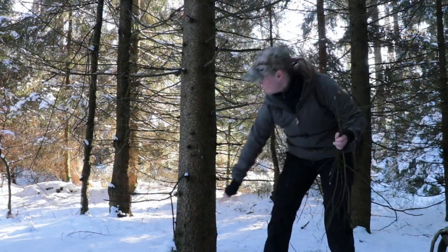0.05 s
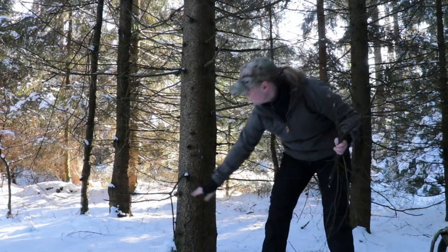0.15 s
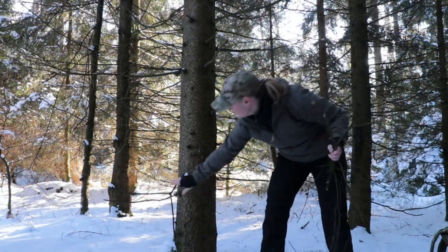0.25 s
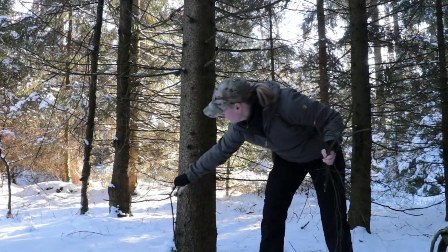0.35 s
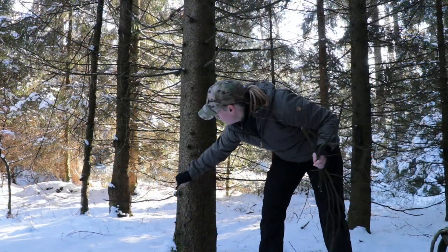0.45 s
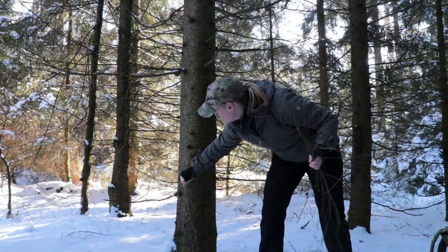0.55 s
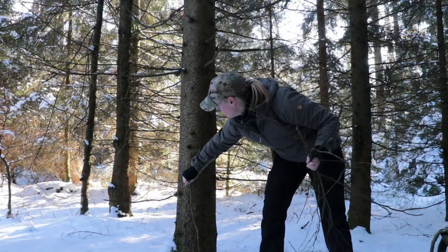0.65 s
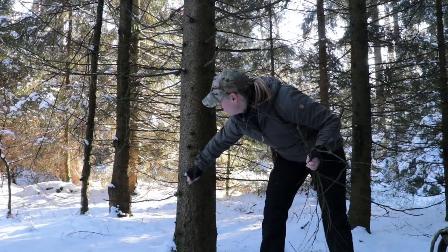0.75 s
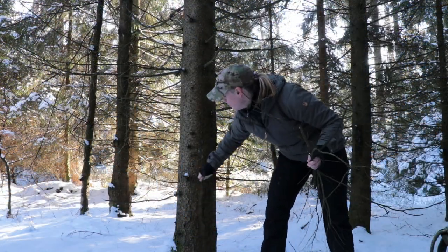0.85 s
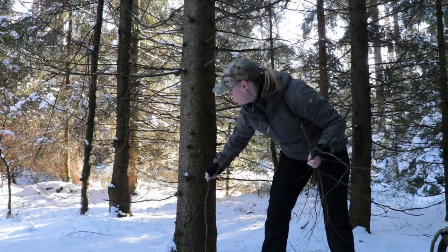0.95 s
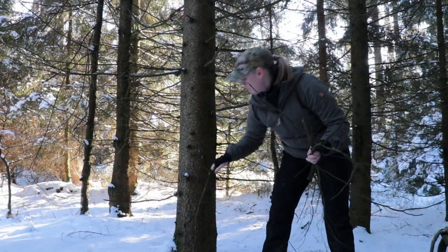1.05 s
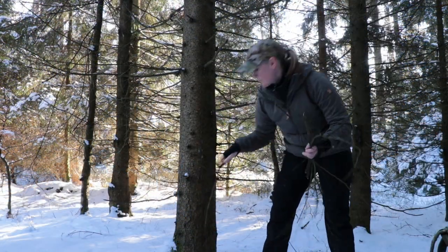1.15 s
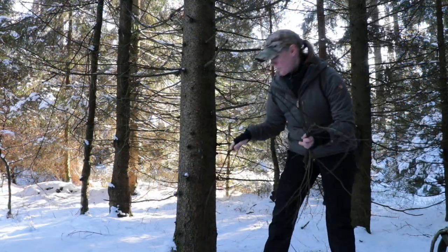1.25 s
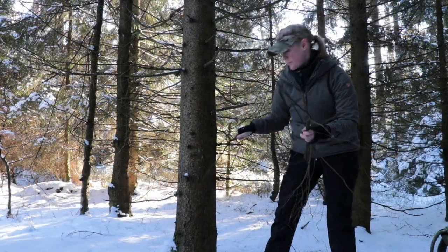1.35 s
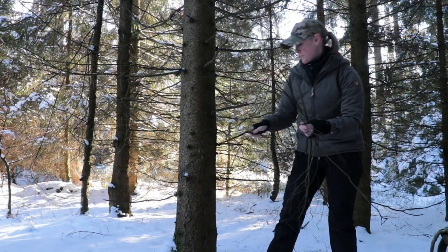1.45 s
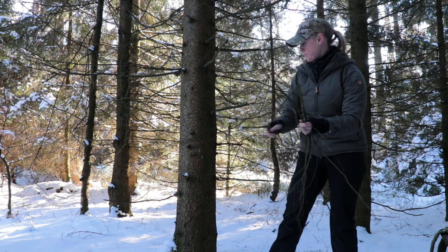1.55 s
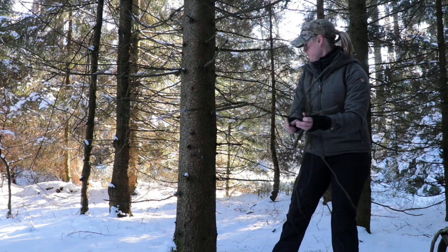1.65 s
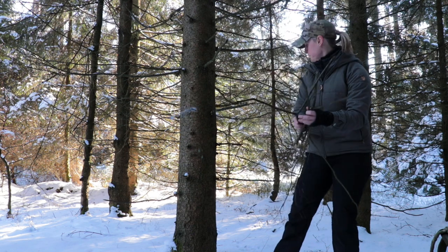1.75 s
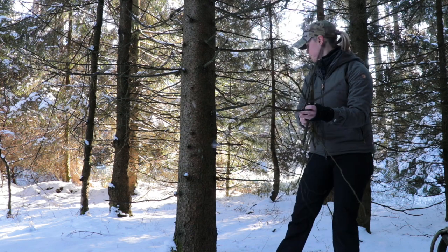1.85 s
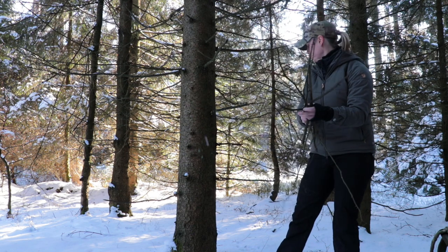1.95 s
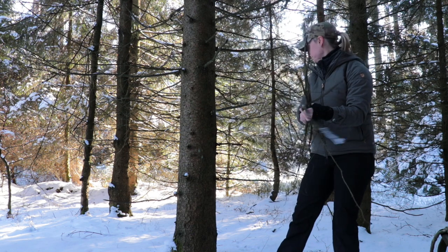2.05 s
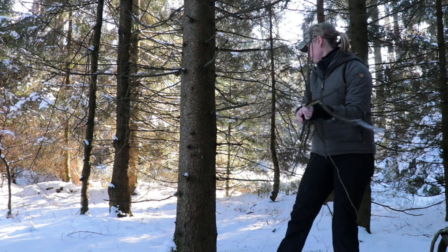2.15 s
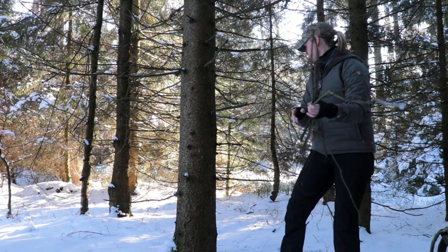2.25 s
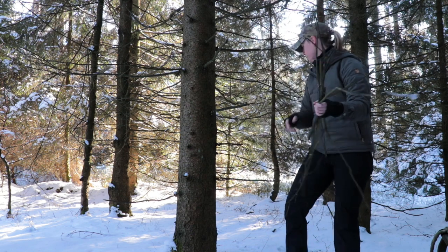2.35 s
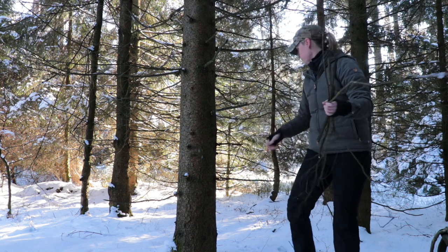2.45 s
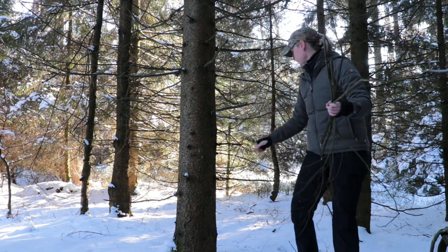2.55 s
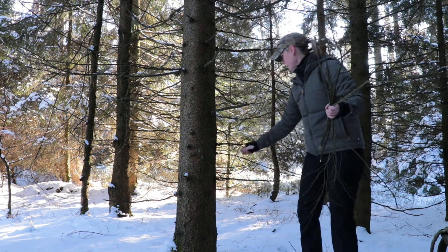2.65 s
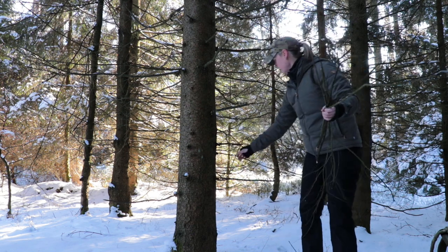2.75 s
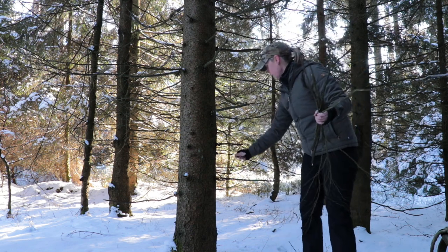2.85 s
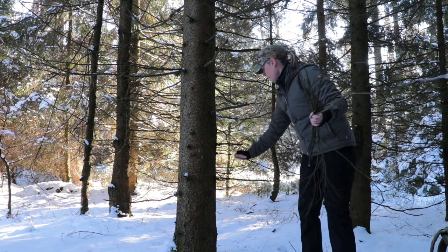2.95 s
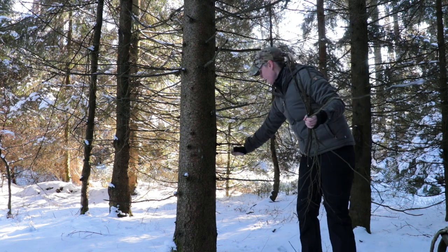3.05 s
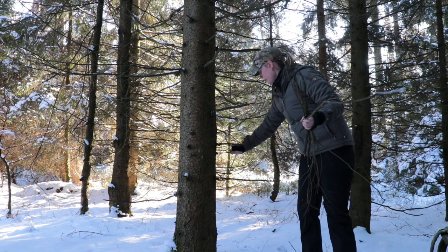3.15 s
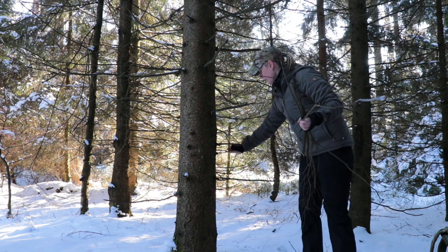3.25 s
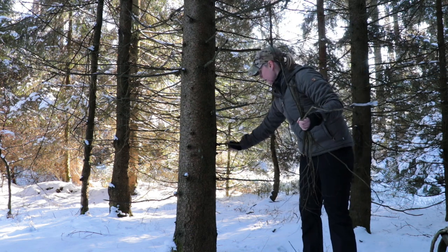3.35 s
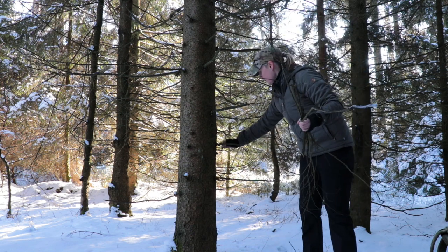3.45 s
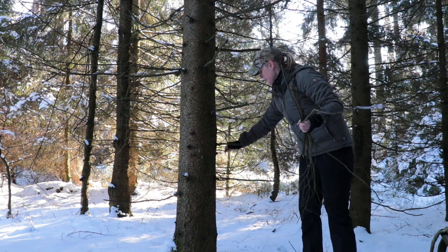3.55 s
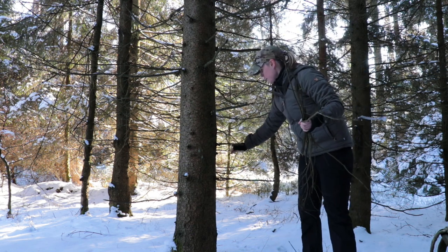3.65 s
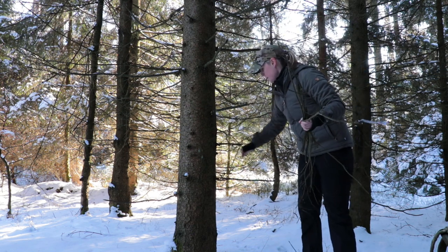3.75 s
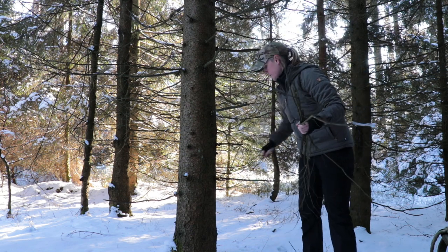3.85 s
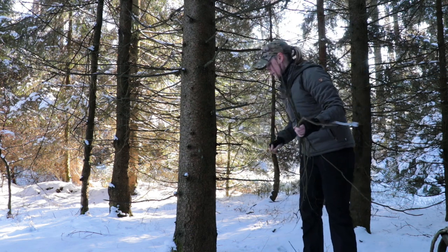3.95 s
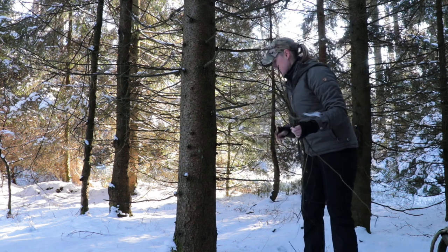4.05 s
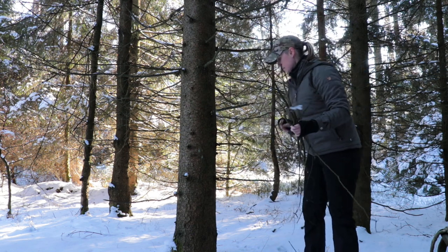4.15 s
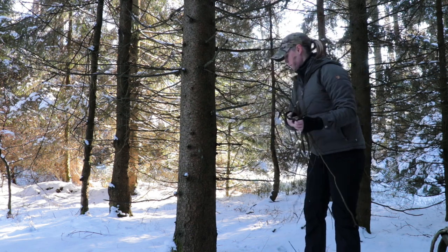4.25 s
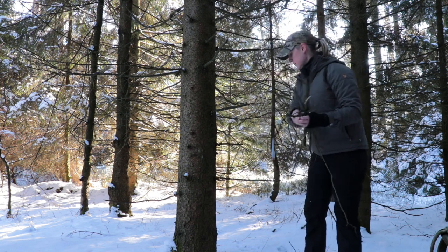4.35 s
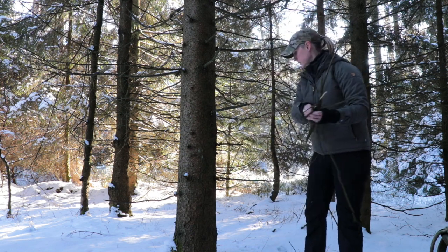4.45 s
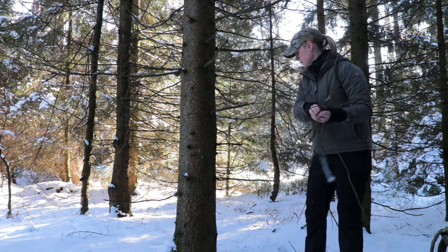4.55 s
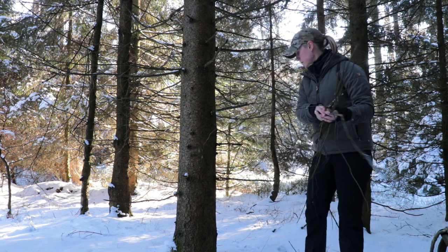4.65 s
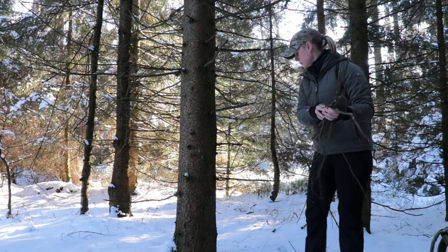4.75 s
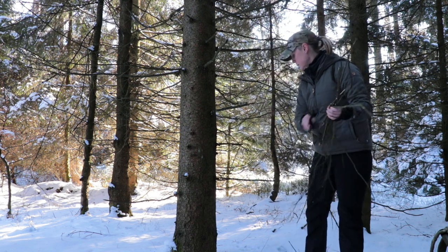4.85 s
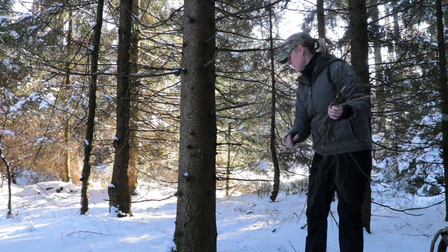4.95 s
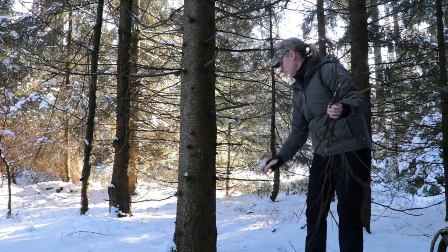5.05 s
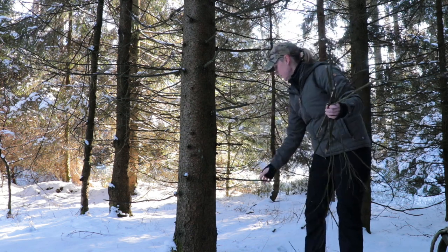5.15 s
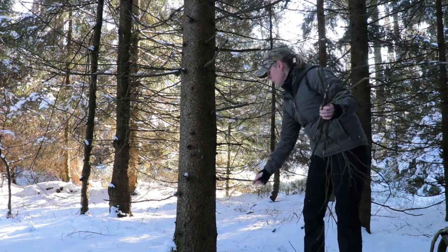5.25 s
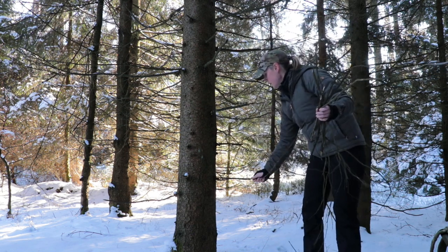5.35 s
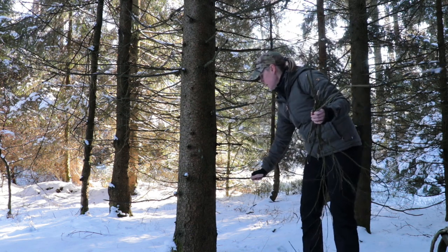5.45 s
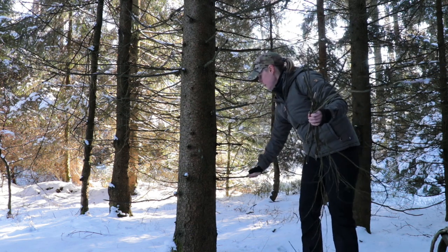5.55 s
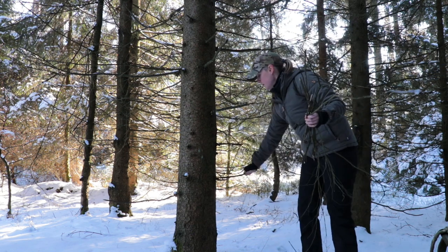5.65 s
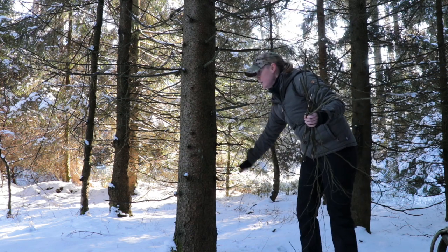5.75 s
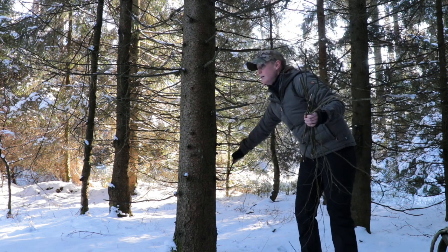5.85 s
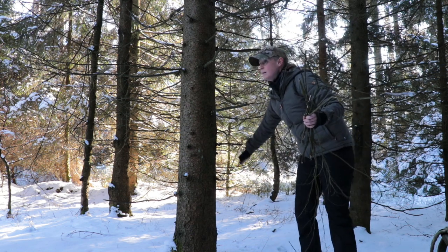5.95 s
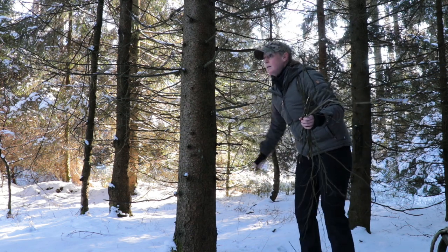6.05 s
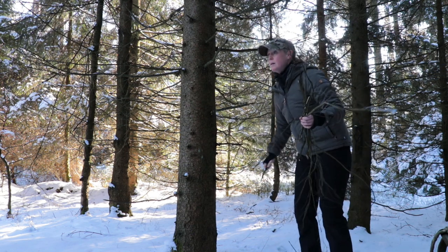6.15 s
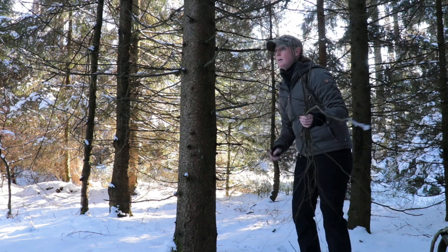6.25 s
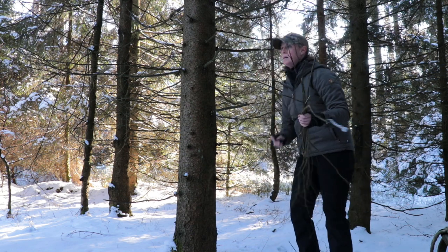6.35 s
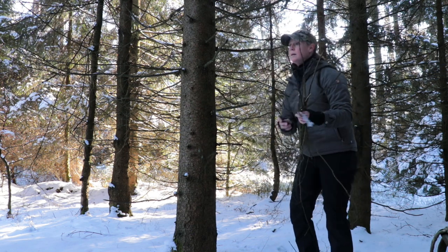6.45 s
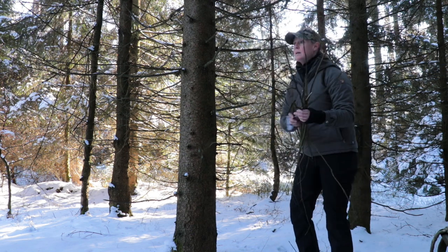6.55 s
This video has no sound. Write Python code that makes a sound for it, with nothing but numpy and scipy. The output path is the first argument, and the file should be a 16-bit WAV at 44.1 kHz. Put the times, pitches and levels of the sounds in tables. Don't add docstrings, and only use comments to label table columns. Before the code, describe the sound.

A quiet snowy forest, heard in stereo from a few metres, with a faint steady hiss. Soft snow crunches and low boot thuds open it. At 0.54 s a tough twig tears with a sharp crack and crackling fibres, again at 0.71-0.76 and, weaker, at 0.83. From 1.5 to 1.9 s small dry ticks and sleeve rustle; a firmer boot knock at 2.13, then gentle shuffling, brushing and weight shifts to 3.2. At 3.33 s a thick branch snaps, very loud, bright and abrupt, with a short diffuse echo off trunks; a thinner twig cracks at 3.55. Light ticks, one clearer at 4.06, cloth scrapes and dull snow thuds continue to about 4.9, then it nearly quiets. At 5.72 s the second branch breaks, the loudest crack, hard-edged and slightly clipped, with a quick forest tail. Faint ticks follow, and a distinct boot thump with rustle at 6.46-6.6.

```python
import sys
import numpy as np
from scipy import signal
from scipy.fft import rfft, irfft
from scipy.io import wavfile
from scipy.ndimage import uniform_filter1d

SR = 44100
rng = np.random.default_rng(int(sys.argv[2]) if len(sys.argv) > 2 else 0)


def output_pcm(signal):
    pcm = np.clip(np.atleast_2d(signal).T, -1, 1) * 32767
    wavfile.write(sys.argv[1], SR, np.round(pcm).astype(np.int16))


def natural_amplitude(level_db):
    exponent = np.asarray(level_db, float) / 20
    return 10 ** exponent


N = 291501

# freq_hz, level_db
HISS = [(41, -29.5), (70, -2), (103, -2.5), (348, -5), (962, -8), (1180, -5.5), (1850, -11), (2780, -11.5),
        (4370, -17.5), (8810, -14), (11800, -17), (15500, -25)]
HISS_DB = -60.5
# freq_hz, likeness
HISS_LIKENESS = [(60, 0.9), (240, 0.35), (950, -0.39), (3770, -0.21), (15000, -0.22)]
# freq_hz, likeness
MOVEMENT_LIKENESS = [(60, 0.95), (240, 0.81), (950, 0.97), (3770, 0.23), (15000, -0.14)]

# freq_hz, level_db
BRUSH_COLOUR = [(3000, -24), (5000, -8), (6500, 4), (10000, 4), (13500, -2), (15500, -9)]
# freq_hz, level_db
CLOTH_COLOUR = [(500, -22.5), (1000, -2), (1400, -0.5), (2000, -7), (3300, -2.5), (4500, -10), (6500, -25)]
# freq_hz, level_db
CRUNCH_COLOUR = [(120, -22.5), (250, -8), (380, 1), (550, -7), (900, -9), (1600, -25.5)]
# freq_hz, level_db
WEIGHT_COLOUR = [(20, -25), (40, 2), (58, 3), (90, -5.5), (160, -10), (300, -32.5)]
# time_s, effort_db
ARMS = [(0, -60.5), (.72, -66), (.86, -62.5), (1.23, -67), (1.56, -63), (1.69, -57), (1.91, -62),
        (2.36, -74), (2.72, -70), (2.91, -62), (3.22, -65), (3.81, -76), (4.07, -63), (4.2, -61.5),
        (4.84, -70), (5.58, -74.5), (6.45, -74), (6.61, -61)]
# time_s, effort_db
LEGS = [(0, -64), (.15, -63), (.33, -69), (.55, -64), (.72, -67), (.86, -60.5), (1.23, -71), (1.56, -65),
        (2.36, -70), (2.91, -63), (3.22, -66), (3.81, -68.5), (4.25, -64), (4.84, -69), (4.95, -67),
        (5.58, -72.5), (6.41, -67.5), (6.61, -70.5)]
SLEEVE_DB, SLEEVE_SLOPE, USUAL_DB = -1.5, 1.1, -65
# middle_s, peak_db, length_s, centre_hz
SCUFFS = [(.01, -55.5, 0.026, 1520), (0.438, -56, 0.036, 3500), (.555, -47, .04, 9000),
          (.565, -52, .06, 3000), (.6, -55, .09, 4500), (.74, -52, .07, 3000), (.765, -50, .06, 9500),
          (.845, -52, .07, 4500), (1.27, -65, .3, 1200), (1.555, -53, 0.082, 1380), (1.56, -57, .06, 8000),
          (1.6, -59, .06, 3000), (1.661, -55, 0.08, 2490), (1.735, -57, .06, 9000), (1.816, -54, .03, 9500),
          (1.809, -53, 0.06, 1400), (2.275, -55.5, 0.1, 1770), (2.69, -62.5, 0.11, 1500),
          (2.85, -58.5, 0.035, 2500), (2.971, -59, 0.054, 3180), (3.032, -59.5, 0.044, 2980),
          (2.97, -58, .05, 8000), (3.03, -59, .05, 9000), (3.09, -58, .07, 8500), (3.81, -58, .025, 5000),
          (4.39, -58, .02, 9500), (3.105, -59, 0.072, 2500), (3.125, -56, 0.082, 1090),
          (3.238, -63, .05, 3000), (4.17, -57.5, 0.16, 2600), (4.3, -57, 0.061, 2000),
          (4.343, -57, 0.019, 1500), (4.411, -59, .03, 3500), (4.496, -60, .04, 1520),
          (4.5, -60, .04, 8500), (4.589, -60, .04, 8500), (4.589, -58, .05, 2800), (4.59, -58, .06, 200),
          (4.643, -57, 0.027, 1450), (4.94, -62.5, 0.12, 1500), (5.299, -63, 0.053, 3000),
          (5.522, -58.5, 0.014, 990)]
# start_s, length_s, level_db
ROLLS = [(0.007, 0.053, -61), (0.176, 0.173, -59), (0.924, 0.029, -62), (1.757, 0.035, -62),
         (2.13, 0.043, -63), (2.271, 0.059, -54), (2.501, 0.029, -64), (2.656, 0.043, -61),
         (2.748, 0.045, -60), (2.82, 0.059, -58), (2.9, 0.105, -57), (3.439, 0.055, -61),
         (3.804, 0.085, -56), (4.117, 0.101, -62), (4.233, 0.167, -53), (4.492, 0.073, -61),
         (4.935, 0.063, -59), (5.939, 0.033, -61), (6.284, 0.123, -59), (6.452, 0.087, -54)]
ROLL_EDGE_S, ROLL_DB, STANDING_DB = .02, -2.5, -2.5
# start_s, peak_db, knock_hz, boom_db (re peak)
THUDS = [(.1, -47, 420, -14), (.12, -50, 400, -14), (.181, -48, 400, -8), (.205, -56, 200, 0),
         (.269, -52, 191, -1), (.295, -46, 446, -10), (.315, -55, 200, 0), (.441, -47, 364, -10),
         (.714, -44, 196, -26), (.804, -45, 196, -25), (.929, -43, 188, -26), (2.132, -38, 200, -20),
         (2.1605, -48, 375, -16), (2.271, -45, 226, -10), (2.283, -48, 336, -8), (2.494, -53, 202, -10),
         (2.689, -47, 300, -17.5), (2.752, -44, 191, -14), (2.77, -50, 191, -7), (2.858, -46, 223, -8),
         (2.905, -43, 252, -8), (2.95, -50, 237, -8), (2.974, -48, 300, -16), (3.014, -43.5, 322, -24),
         (3.077, -42, 340, -30), (3.11, -44.5, 300, -22), (3.402, -44.5, 390, -14), (3.434, -46, 417, -12),
         (3.703, -48, 300, -9), (3.808, -51, 250, 0), (4.023, -45, 315, -22), (4.128, -44.5, 320, -9),
         (4.302, -47, 193, 0), (4.342, -50, 350, -8), (4.423, -42, 380, -21), (4.49, -43, 322, -15),
         (4.503, -41.5, 417, -9), (4.93, -48, 193, -4), (5.385, -57, 250, -5), (5.736, -44, 400, -20),
         (5.94, -47, 250, -6), (6.4612, -39, 330, -8), (6.4645, -39, 220, -12)]
BOOT_LAG = 5

# freq_hz, t60_s
FOREST_T60 = [(500, 0.21), (1500, 0.23), (3000, 0.19), (5000, 0.21), (8000, 0.2), (12000, 0.2),
              (16000, 0.24)]
# freq_hz, level_db
FAR_TRUNKS = [(2000, -22), (8000, -23), (12000, -26), (16000, -31)]
# delay_s, left_db, right_db
NEAR_TRUNKS = [(.0055, -29, -26), (0.0105, -27, -24), (0.017, -19.5, -18), (.0225, -24, -22.5)]

# freq_hz, level_db
CRACK_COLOUR = [(300, -25.5), (900, -13.5), (1600, -5), (3000, -5.5), (3900, -4.5), (5000, -14), (6300, -5),
                (9000, -1.5), (12000, -5.5), (14000, -7.5), (15600, -12), (16500, -30)]
# start_s, peak_db, woody_db (re bright band), ring_hz
BREAKS = [(.5399, -16, -10, 2100), (.5431, -29, -7, 8000), (.5462, -31, -10, 9000), (.549, -35, -14, 2990),
          (.5514, -34, -12, 3120), (.5568, -33, -7, 10000), (.563, -35, -10, 3360), (.5706, -33, -8, 5600),
          (.586, -32, -2.5, 3660), (.5932, -23, -5.5, 2150), (.6108, -39.5, -6, 3140),
          (.618, -42, -10, 7600), (.7147, -19, -5, 4220), (.7202, -25, -6, 4290), (.7308, -23, -17, 11000),
          (.7418, -20, -13, 10500), (.7446, -21, -11, 7200), (.747, -27.5, -9, 1570),
          (.7612, -35, -14, 9000), (.7842, -41, -8, 7000), (.8117, -43, -4, 13000), (.8212, -35, 0, 3790),
          (.8254, -22.5, -4, 2390), (.8291, -27, -8, 2330), (.847, -46, -8, 8500), (.9276, -45, -3, 3290),
          (3.3155, -49, -7, 2430)]
# start_s, peak_db, woody_db (re bright band), ring_hz
TICKS = [(1.525, -40, 5, 1360), (1.5415, -37, -.5, 1290), (1.5541, -46, -2, 1310),
         (1.7705, -35.5, -4, 6500), (1.8064, -44, 5, 1080), (1.82, -44.5, -16, 4290),
         (1.9047, -45.5, -12, 1360), (2.1598, -36.5, -6, 13500), (2.8828, -47.5, -4, 3360),
         (2.9803, -46, 1, 3210), (3.014, -47, -1, 3120), (3.0976, -44, -3, 8000), (3.1054, -41.5, 1, 3680),
         (3.1215, -50, 2.5, 1460), (3.5463, -29, -7, 1920), (3.5527, -42, -7, 2780),
         (3.5934, -48.5, 1, 1590), (3.6893, -43, 8, 3170), (3.764, -39.5, -.5, 2840),
         (3.8057, -48, 3, 1010), (3.977, -41.5, -12, 1310), (4.0578, -31, -2, 6500),
         (4.4061, -45, -10, 2300), (4.6374, -40, 9, 1360), (4.716, -41.5, -7, 3530),
         (4.3835, -47, -11, 8000), (5.3845, -39, -1, 2910), (5.5768, -42.5, -11.5, 2800),
         (6.266, -41, -3, 3230), (6.3279, -46, -8, 1440)]
# start_s, peak_db, woody_db (re bright band), ring_hz
SPLINTERS = [(.412, -50, 0, 2900), (.4294, -47, 0, 3400), (.6537, -45, 2, 3600), (.6925, -45, -14, 8500),
             (1.615, -47, 0, 3000), (1.6459, -46, 4, 3500), (1.7875, -47, -14, 12500),
             (1.8265, -44, -12, 9500), (1.8868, -46, -14, 12000), (2.278, -53, 4, 1400),
             (2.7364, -44, -10, 8500), (2.752, -48, -4, 5500), (2.8396, -48, 2, 3440),
             (2.859, -47, 8, 1500), (2.9499, -47, -3, 8800), (3.004, -48, 6, 1800), (3.0661, -48, 3, 8500),
             (3.077, -45, 6, 1500), (3.135, -47, 2, 2500), (3.6597, -48, -8, 9500), (4.188, -47, 6, 1600),
             (4.213, -48, 2, 2600), (4.313, -48, -12, 12500), (4.45, -50, -8, 11000),
             (4.517, -49, -10, 11000), (4.7225, -47, -10, 9000), (4.7325, -45, -6, 8000),
             (5.2042, -49, 2, 2660), (5.396, -48, -10, 9500), (5.478, -51, 3, 3500),
             (5.512, -49, -12, 8500), (5.546, -51, -12, 8000), (5.631, -51, -3, 5500),
             (6.078, -50, -14, 12000), (6.4614, -50, 3, 1400), (6.605, -47, -8, 10000)]
# start_s, peak_db, t60_s
THICK = [
    (3.3269, -2, .006),
    (5.7193, 4.6, .012),
]
# start_s, then a list of freq_hz, level_db
BRANCHES = [
    (3.327, [(150, -44), (450, -29), (780, -14), (1150, -16), (1600, -1), (1900, -10), (2300, -2), (2650, -11), (3000, -3), (3600, -8), (4350, -22), (5200, -5), (6570, -3.5), (9160, 0), (12800, 0), (14900, -6), (16300, -13.5)]),
    (5.721, [(150, -50), (460, -14), (900, -30), (1250, -17), (1950, -4.5), (2450, -13), (2990, 2), (3280, -9), (3750, -.5), (4800, -12), (5910, -2), (7200, 1.5), (8800, 0), (12300, 1.5), (13000, -11), (15000, -6), (16500, -30)]),
]
# freq_hz, level_db
FIRST_TEAR = [(250, -20), (1160, -13), (1700, -6), (2820, -5), (3600, -10), (4700, -8), (5880, -15),
              (7600, 0), (9500, -3), (12300, -3), (15000, -14), (16300, -33)]
# freq_hz, level_db
LAST_FIBRE = [(180, -50), (300, -20), (1050, -13), (2120, -2), (4280, -6), (5230, -11), (6610, 1),
              (16300, -15)]
# freq_hz, level_db
SECOND_TEAR = [(250, -19), (983, -16), (2200, -9), (3000, -12), (4070, -2), (5590, -17), (6600, -11),
               (9870, 0), (13100, -8), (16300, -29)]
# freq_hz, level_db
BARK_STRIP = [(180, -54), (300, -24), (1000, -23), (2160, -10), (5060, -17), (7560, 0), (10000, -3),
              (16300, -17)]
# freq_hz, level_db
THIRD_TEAR = [(180, -43), (300, -13), (1140, -4), (2420, -7), (3620, 0), (5590, -8), (8640, -1),
              (13100, -7), (16300, -22)]
# freq_hz, level_db
THIN_TWIG = [(180, -49), (300, -19), (1310, -14), (1920, 0), (5140, -13), (6720, -7), (13100, -11),
             (14500, 0), (16300, -12)]
# freq_hz, level_db
BUNDLE_TWIG = [(180, -47), (300, -17), (3280, -5), (4650, -9), (7070, 1), (8780, -12), (11700, -13),
               (16300, -33)]
# start_s, colour
TEARS = [(.5399, FIRST_TEAR), (.5932, LAST_FIBRE), (.7147, SECOND_TEAR), (.7446, BARK_STRIP),
         (.8254, THIRD_TEAR), (3.5463, THIN_TWIG), (4.0578, BUNDLE_TWIG)]
# start_s, then a list of freq_hz, level_db
SIDEWAYS = [
    (3.327, [(500, 0), (1400, 0), (2600, -4), (4300, 3), (5700, -3), (8000, -1), (13000, -2), (16000, 3)]),
    (5.721, [(500, 6), (950, 8), (1600, 6), (3500, -1), (4800, 4), (7500, 0), (11000, -2), (16000, 3)]),
]
# time_s, left_right_db
HANDS = [(.55, -1.5), (.93, 0), (1.53, -8), (1.85, -13), (2.9, 9), (3.1, -4), (3.33, -1.5), (3.55, -2),
         (3.78, 9), (4.0, -4), (4.4, -12), (4.72, 8), (5.38, 8), (5.72, -5.5), (6.3, -9)]
# time_s, share
UNLIKE = [(.7, 1.3), (1.5, 1.1), (3.33, .55), (4.0, .9), (5.72, 1.4)]
SCATTER_DB = 1.5
VOLLEY_S, QUICKER_S_PER_DB, FAINT_DB = .010, .00008, -45
TICK_S, SPLINTER_S = .006, .004
PARTED_S, PARTED_DB = .0040, -17


def evened(x):
    return x / np.sqrt(np.mean(x ** 2) + 1e-20)


def read(points, hz):
    f, value = np.transpose(points)
    return np.interp(np.log(hz + 1), np.log(f + 1), value)


def add(mix, s, sound):
    part = mix[..., round(s * SR):][..., :sound.shape[-1]]
    part += sound[..., :part.shape[-1]]


def colour(points, size=1):
    log_gain = np.log(natural_amplitude(read(points, abs(np.fft.fftfreq(4096, 1 / SR)))))
    log_gain = uniform_filter1d(log_gain, size=size, mode="wrap")
    return np.fft.ifft(np.exp(signal.hilbert(log_gain).conj())).real[:1024]


def noise(points, likeness, patchy_db, size=512):
    frames, hz = 4 * N // size + 5, np.fft.rfftfreq(size, 1 / SR)
    a, b, c, d, patches = rng.standard_normal((frames, len(hz), 5)).T
    patches = uniform_filter1d(patches, size=8, axis=0)
    patches = evened(uniform_filter1d(patches, size=10, axis=1))
    like = np.clip(read(likeness, hz), -1, 1)[:, None]
    left = a + 1j * b
    right = like * left + np.sqrt(1 - like ** 2) * (c + 1j * d)
    z = np.array([left, right]) * natural_amplitude(read(points, hz)[:, None] + patchy_db * patches)
    return evened(signal.istft(z, nperseg=size, noverlap=size * 3 // 4)[1][:, :N])


def hiss():
    return natural_amplitude(HISS_DB) * noise(HISS, HISS_LIKENESS, 0.6, size=2048)


def grains(per_s, spread_db, seconds):
    clicks = natural_amplitude(spread_db * np.minimum(rng.exponential(1, N), 2.8)) * (rng.random(N) < per_s / SR)
    return evened(signal.lfilter([1], [1, -np.exp(-1 / (seconds * SR))], clicks))


def weight(legs_db):
    level = natural_amplitude(legs_db + STANDING_DB)
    for s, seconds, db in ROLLS:
        t = np.arange(0, seconds + 2 * ROLL_EDGE_S, 1 / SR)
        swell = np.clip(np.minimum(t, t[::-1]) / (2 * ROLL_EDGE_S), 0, 1)
        add(level, max(s - ROLL_EDGE_S, 0), natural_amplitude(db + ROLL_DB) * swell ** 2)
    return level


def scuff(grit, s, db, seconds, hz):
    start = max(s - seconds / 2, 0)
    part = grit[:, round(start * SR):][:, :round(seconds * SR)]
    sos = signal.butter(2, [hz / 2.53, hz * 1.69], "bandpass", fs=SR, output="sos")
    return start, natural_amplitude(db) * evened(signal.sosfilt(sos, part)) * np.hanning(part.shape[1])


def movements():
    t = np.arange(N) / SR
    arms_db = np.interp(t, *np.transpose(ARMS))
    legs_db = np.interp(t, *np.transpose(LEGS))
    sleeve_db = USUAL_DB + SLEEVE_DB + SLEEVE_SLOPE * (arms_db - USUAL_DB)

    brush = noise(BRUSH_COLOUR, MOVEMENT_LIKENESS, 1.5) * evened(2.0 + grains(300, 3.8, .0012))
    cloth = noise(CLOTH_COLOUR, MOVEMENT_LIKENESS, 2) * evened(1.4 + grains(300, 3.8, .002))
    crunch = noise(CRUNCH_COLOUR, MOVEMENT_LIKENESS, 2, size=1024) * evened(1.5 + grains(80, 3.5, .006))
    ground = noise(WEIGHT_COLOUR, [(30, .95), (200, .92)], .7, size=2048)
    out = natural_amplitude(arms_db) * brush + natural_amplitude(sleeve_db) * cloth
    out += natural_amplitude(legs_db) * crunch + weight(legs_db) * ground

    grit = noise([(100, 0), (16000, 0)], MOVEMENT_LIKENESS, 2.5, size=256)
    grit *= evened(.7 + grains(450, 3.4, .0012))
    for row in SCUFFS:
        add(out, *scuff(grit, *row))
    return out


def thud(peak_db, hz, boom_db):
    t = np.arange(int(.2 * SR)) / SR
    knock_hz = hz * (0.7 + .3 * np.exp(-t / .007) + 1.3 * np.exp(-t / 0.001))
    knock = -natural_amplitude(-60 * t / 0.034) * np.sin(2 * np.pi * np.cumsum(knock_hz) / SR)
    boom_hz = 75 + 70 * np.exp(-t / 0.013)
    boom = natural_amplitude(boom_db + 3.5 - 60 * t / .13) * np.sin(2 * np.pi * np.cumsum(boom_hz) / SR)
    both = np.minimum(t / 0.0008, 1) * knock + np.minimum(t / 0.0057, 1) * boom
    return natural_amplitude(peak_db - 0.5) * both


def forest(spread):
    taps = np.zeros((2, SR // 2))
    at = np.arange(100, SR // 2 - 10, 10) + rng.integers(0, 10, (2, (SR // 2 - 101) // 10))
    np.put_along_axis(taps, at, rng.choice([-1., 1.], at.shape), 1)
    hz, t, z = signal.stft(taps, SR, nperseg=128)
    decay = natural_amplitude(-60 * t / read(FOREST_T60, hz)[:, None])
    decay = decay + natural_amplitude(7.5 - 60 * t / 0.034)
    decay = decay + natural_amplitude(read(FAR_TRUNKS, hz)[:, None] - 60 * t / 0.71)
    tail = signal.istft(z * decay, SR, nperseg=128)[1]
    tail = natural_amplitude(-9) * tail / np.linalg.norm(tail[0])
    barks = rng.standard_normal((len(NEAR_TRUNKS), 2, 200))
    for (delay, *db), bark in zip(NEAR_TRUNKS, barks):
        bark = signal.lfilter([1], [1, -.6], bark)
        bark = bark * natural_amplitude(-60 * np.arange(bark.shape[1]) / SR / .004)
        add(tail, delay, natural_amplitude(np.array(db))[:, None] * bark / np.linalg.norm(bark[0]))
    return signal.fftconvolve(spread[None], tail, axes=1)[:, :N]


def twig(woody_db, ring_hz):
    hz = np.geomspace(250, 17000, num=90)
    ring_db = 8.0 * np.exp(-(np.log(hz / ring_hz) / 0.14) ** 2)
    return list(zip(hz, read(CRACK_COLOUR, hz) + (woody_db + 4.0) * (hz < 4300) + ring_db))


def snap(chance, s, peak_db, woody_db, ring_hz, t60, pan_db):
    own = [points for when, points in BRANCHES if abs(when - s) < .006]
    own += [points for when, points in TEARS if abs(when - s) < .0025]
    thick = [points for when, points in SIDEWAYS if abs(when - s) < .003]
    points = own[0] if own else twig(woody_db, ring_hz)
    wood = colour(points)
    around = colour(points, size=81)

    t = np.arange(len(chance[0])) / SR
    shape = np.minimum(t / 0.00051, 1) ** 2 * natural_amplitude(-60 * t / t60)
    apart = np.diff(chance[1:3], axis=1, prepend=0)
    unlike = np.interp(s, *np.transpose(UNLIKE))
    volley = (chance[0] + unlike * (0.22 * chance[3:] + 0.3 * apart)) * shape
    volley = rfft(volley, axis=1)
    usual = uniform_filter1d(abs(volley.mean(axis=0)), size=5 if thick else 19)
    volley /= usual ** (1 if own else .7)
    direct = signal.fftconvolve(irfft(volley, axis=1)[:, :620], wood[None], axes=1)
    if thick:
        after_s = np.arange(direct.shape[1]) / SR - PARTED_S
        direct *= natural_amplitude(PARTED_DB * np.clip(after_s / .0004, 0, 1))
    direct *= natural_amplitude(peak_db + 2.0) / abs(direct).max()
    spread = around * np.linalg.norm(direct[0]) / np.linalg.norm(around)
    if thick:
        spread = np.convolve(spread, colour(thick[0]))
    return natural_amplitude(pan_db * np.array([[.5], [-.5]])) * direct, spread


def scene():
    boots = np.zeros(N)
    for s, *row in THUDS:
        add(boots, s, thud(*row))
    boots = np.array([np.roll(boots, BOOT_LAG), boots])

    snaps = [(row, VOLLEY_S - QUICKER_S_PER_DB * (row[1] - FAINT_DB)) for row in BREAKS]
    snaps += [(row, TICK_S) for row in TICKS]
    snaps += [(row, SPLINTER_S) for row in SPLINTERS]
    snaps += [((s, db, 0, 1000), t60) for s, db, t60 in THICK]
    twigs, spread = np.zeros((2, N)), np.zeros(N)
    chances = rng.standard_normal((len(snaps), 5, 900))
    for ((s, db, *wood), t60), chance in zip(snaps, chances):
        pan_db = np.interp(s, *np.transpose(HANDS)) + SCATTER_DB * chance[0, -1]
        direct, around = snap(chance, s, db, *wood, t60, pan_db)
        add(twigs, s, direct)
        add(spread, s, around)

    background = forest(spread) + movements() + hiss()
    dull = signal.firwin(601, 15800, fs=SR)[None]
    edge = signal.firwin(301, 16300, fs=SR)[None]
    background = signal.oaconvolve(background, dull, "same", axes=1)
    return signal.oaconvolve(twigs, edge, "same", axes=1) + boots + background


def top_cut(x):
    return signal.sosfilt(signal.butter(12, 16450, fs=SR, output="sos"), x)


def record(dry):
    thin = signal.sosfilt(signal.butter(2, 48, "highpass", fs=SR, output="sos"), dry)
    mix = np.clip(thin, -1, 1)
    return top_cut(mix)


dry = scene()
out = record(dry)
output_pcm(out)
```